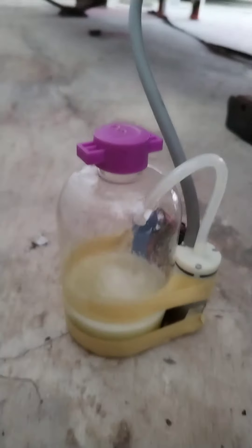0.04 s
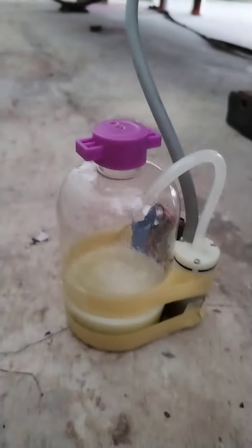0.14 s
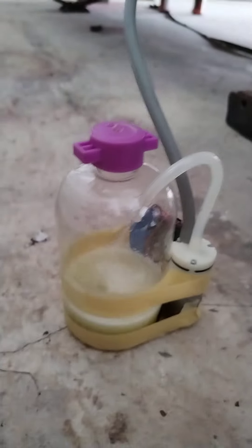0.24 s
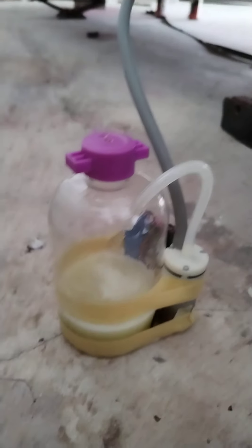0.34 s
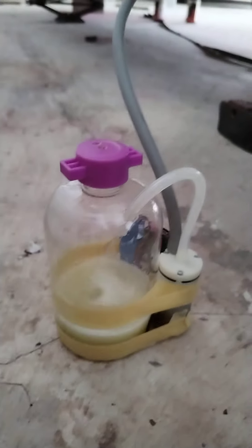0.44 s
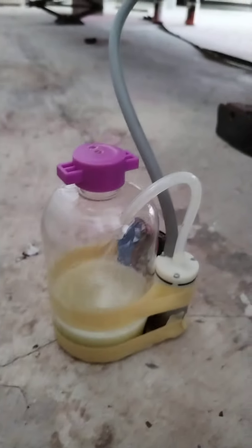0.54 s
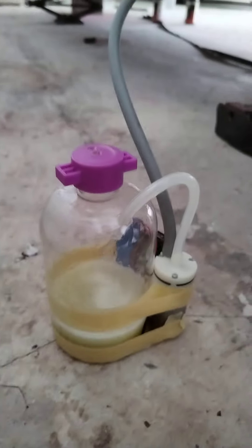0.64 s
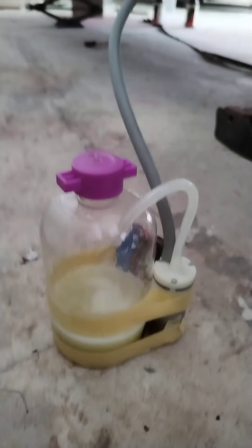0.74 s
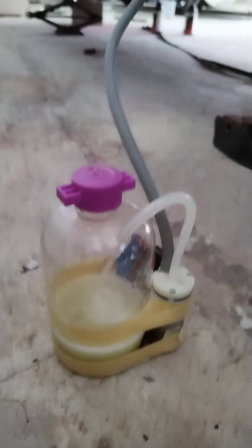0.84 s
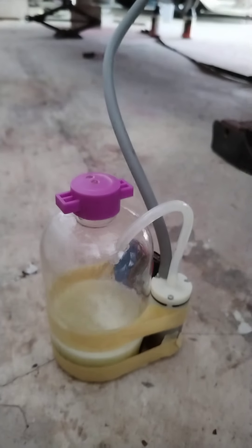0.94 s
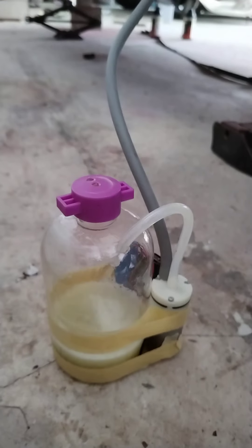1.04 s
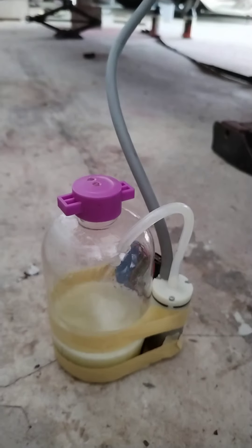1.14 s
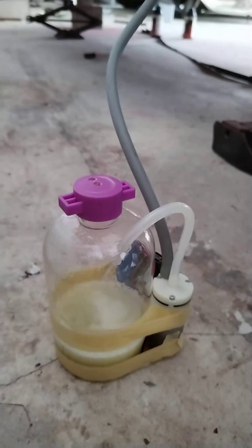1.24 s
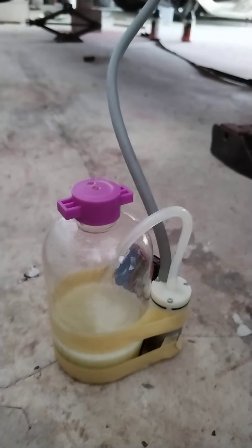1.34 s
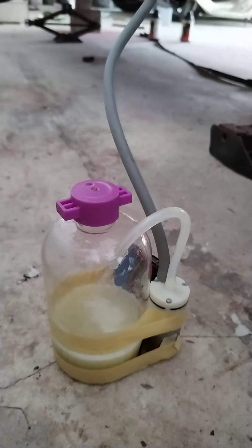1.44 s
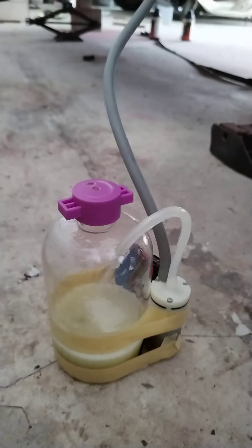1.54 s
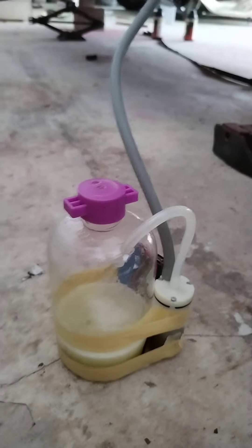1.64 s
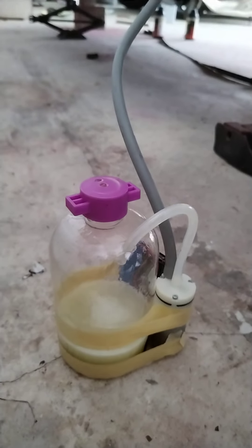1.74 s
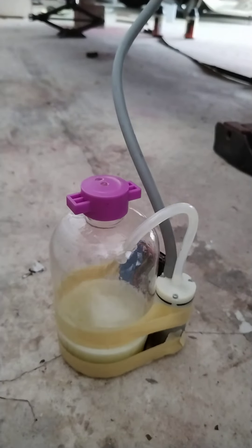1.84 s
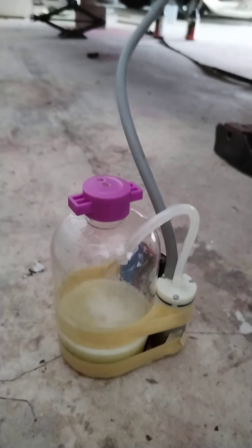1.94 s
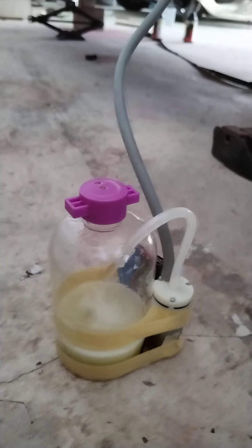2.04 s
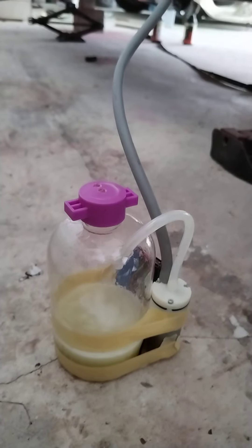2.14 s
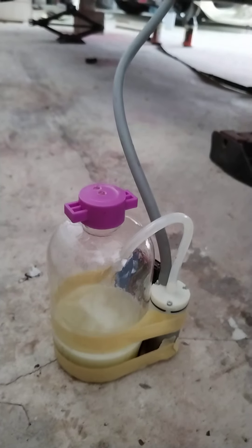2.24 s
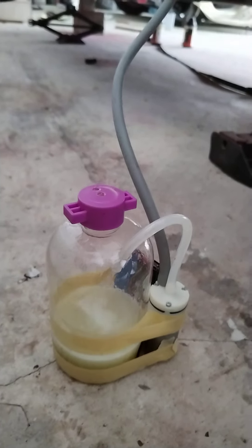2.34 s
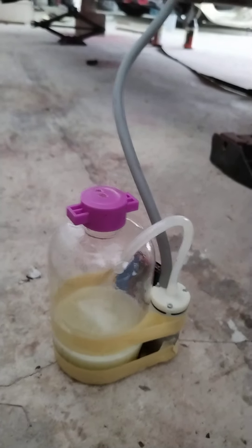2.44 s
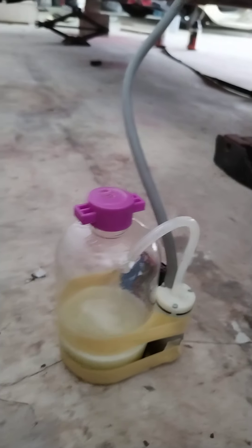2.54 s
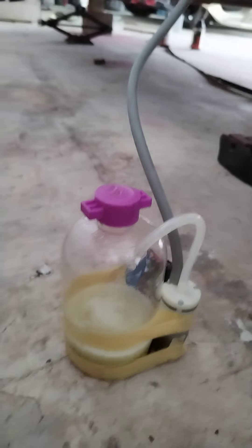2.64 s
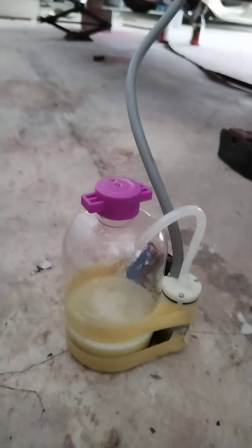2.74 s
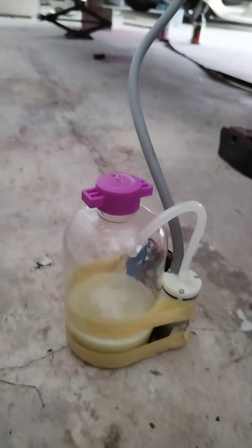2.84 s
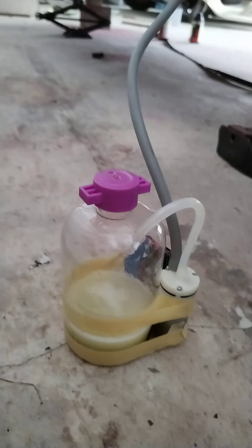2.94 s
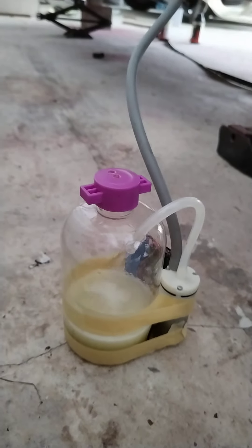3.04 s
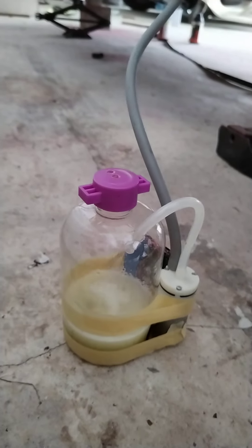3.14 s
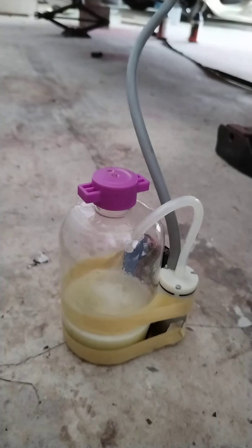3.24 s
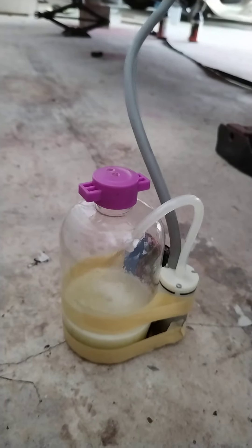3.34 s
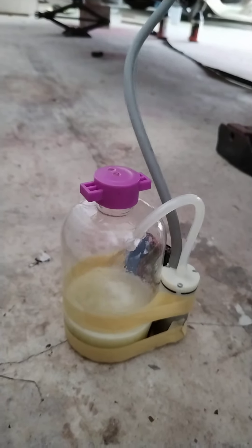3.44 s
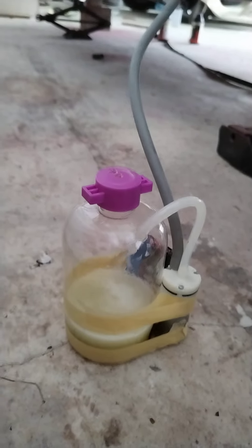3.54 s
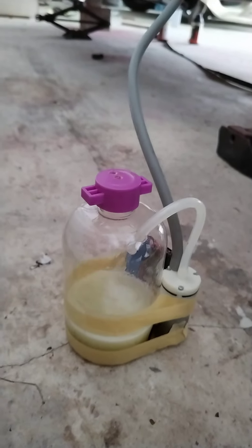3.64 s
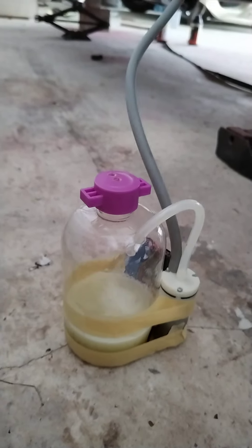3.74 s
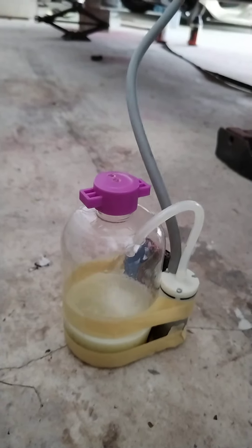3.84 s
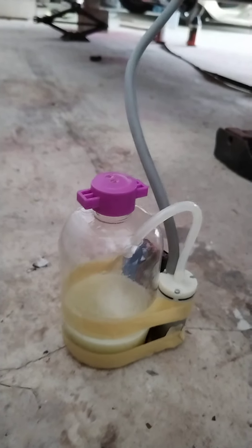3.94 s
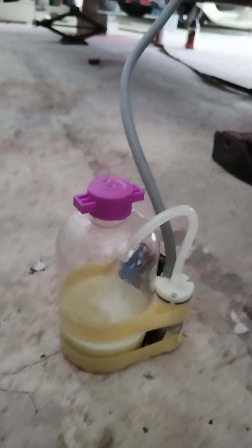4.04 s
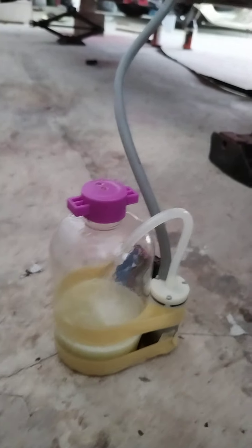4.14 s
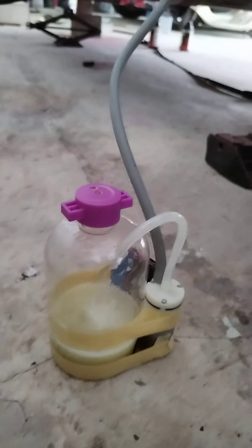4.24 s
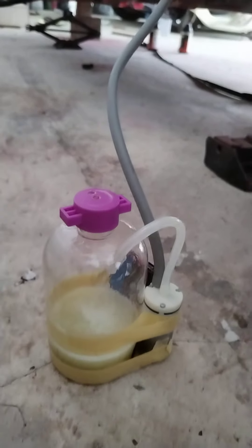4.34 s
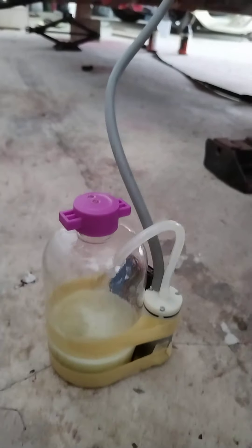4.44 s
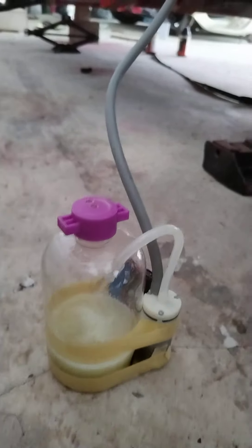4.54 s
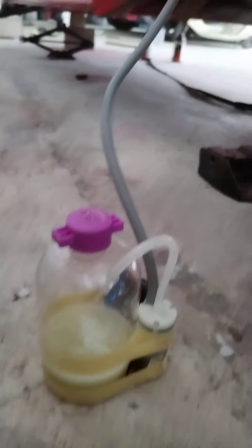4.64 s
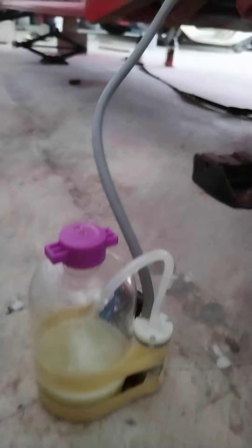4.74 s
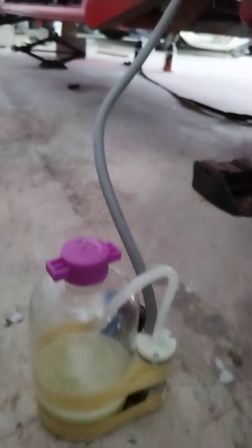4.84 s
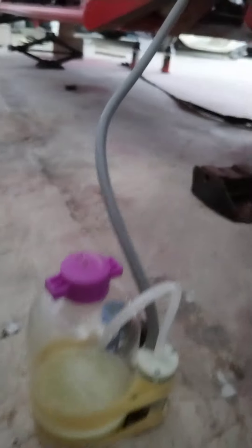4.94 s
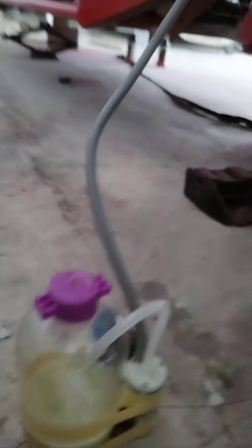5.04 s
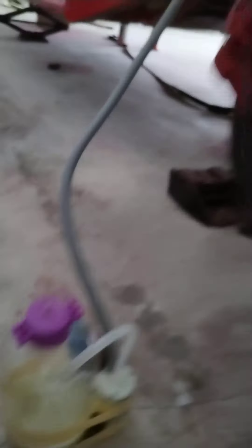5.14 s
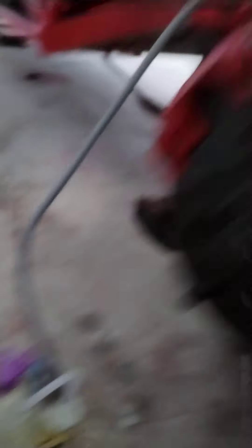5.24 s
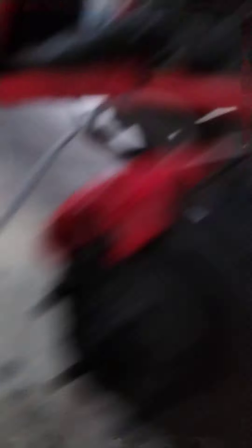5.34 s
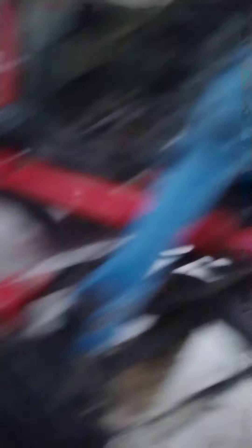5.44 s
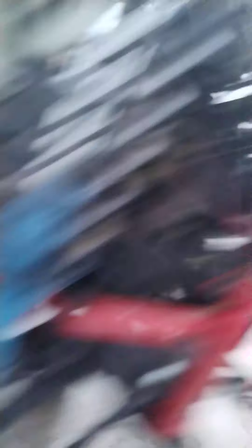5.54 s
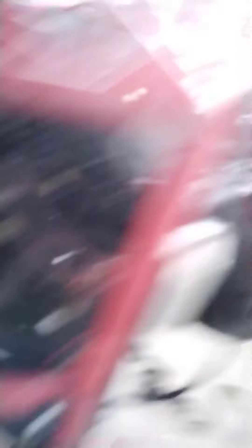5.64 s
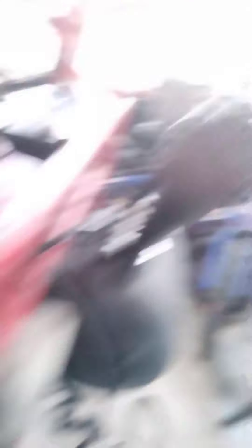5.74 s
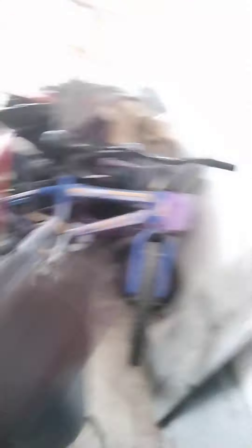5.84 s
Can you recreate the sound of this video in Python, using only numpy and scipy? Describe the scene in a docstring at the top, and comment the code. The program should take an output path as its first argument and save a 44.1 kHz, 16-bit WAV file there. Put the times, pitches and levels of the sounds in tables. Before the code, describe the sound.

Close up on a garage floor, a small suction pump draws oil into a plastic jar: constant bright, buzzing air hiss, low bubbling, wet gulps and crisp little spits. Near five seconds the handheld camera is bumped, with deep thuds and rubbing; it swings away, the hiss fades and a hard clack sounds.

```python
"""Garage floor: a small electric suction pump draws oil up a hose into a plastic jar.
Oil churns (filtered crackle, bubble tones, motor hum), gulps (decaying tones) and sloshes (jar resonances).
Air and spray hiss through the inlet (resonant noise), fluttering near the pump stroke rate.
Near the end the handheld camera is bumped and swung away: low knocks (decaying body modes), rubbing,
a sharp clack (noise burst), and the hiss falls behind."""
import sys
import numpy as np
from scipy import signal
from scipy.fft import rfft, irfft, next_fast_len
from scipy.io import wavfile
from scipy.ndimage import map_coordinates

SR = 44100
rng = np.random.default_rng(int(sys.argv[2]) if len(sys.argv) > 2 else 0)


def bounce(signal):
    """Save signal as a 16-bit WAV file at the path given by the first command-line argument."""
    frames = np.transpose(np.atleast_2d(signal))
    limited = np.clip(frames, -1, 1)
    pcm = np.round(limited * 32767).astype(np.int16)
    wavfile.write(sys.argv[1], SR, pcm)


N = 260184
STROKE_HZ = 217.5  # mean pump stroke rate
HISS_SPLIT_HZ = 7700  # between body and top of the hiss
TOP_HZ = 14350  # upper band limit
JAR_SHADOW, HISS_SHADOW, TOP_SHADOW = 3, 0.92, 1.02  # loss with the camera turn [dB per dB]
# rubbing after a bump: offset, growth [dB per dB of bump], fade
RUB_DB, RUB_GROWTH, RUB_FADE_DB_PER_S = -15.5, 0.85, 92

# Levels in the tables are relative.
# jar resonances at two microphones: (frequency [Hz], width scale [Hz], left [dB], right [dB])
JAR_MODES = [(917.3, 179, 2, -13), (949, 120, -31, -14.5), (1215.4, 112, -18.5, -10.5),
             (1655, 165, -7.5, -37), (1802, 120, -51.5, -8.5), (2040, 118, -11.5, -12.5),
             (2190, 104, 0.5, 3.5), (2462, 112, 1.5, -28), (2608, 203, -2, -68)]
# inlet tube resonances: (frequency [Hz], width scale [Hz], left [dB], right [dB])
TUBE_MODES = [(3020, 120, -13.5, -10.5), (3170, 144, -16.5, -12), (3524, 71, -26, -19.5),
              (3860, 144, -13, -13.5), (4390, 580, -16, -18)]
# air jet resonances: (frequency [Hz], width scale [Hz], left [dB], right [dB])
JET_MODES = [(4370, 110, -10, -9), (4625, 128, -2, -4.5), (5225, 400, -2, -6.5), (5666, 190, 6, -2),
             (6092, 550, 8.5, -5), (6674, 890, 3, -5.5), (7180, 950, -20, -12), (8592, 1620, -22.5, -6),
             (11800, 5500, -28.5, -23.5)]
# flow of oil into the jar: (time [s], level [dB])
OIL_FLOW = [(0.0, -43), (0.17, -41), (0.28, -48), (0.32, -45), (1.58, -51.5), (1.65, -47.5), (2.58, -42.5),
            (2.67, -51.5), (3.38, -40.5), (3.53, -47.5), (4.35, -44), (4.85, -48.5)]
# air jet: (time [s], body level [dB], top level [dB])
HISS_LEVELS = [(0.0, -38, -41.5), (.25, -37.5, -38), (1.1, -36.5, -39.5), (4.6, -36.5, -40),
               (4.9, -35, -40), (5.35, -35, -41.5)]
# pouring oil spectrum: (frequency [Hz], gain [dB])
OIL_SPECTRUM = [(15, -69), (25, -25.5), (91, -16), (137, -1.5), (156, -2), (188, -1.5), (225, -2.5),
                (259, -9), (294, -7), (360, -13), (435, -29.5), (494, -70), (520, -27), (680, -64),
                (1140, -120)]
# rubbing grip spectrum: (frequency [Hz], gain [dB])
GRIP_SPECTRUM = [(25, -56), (60, -43), (100, 0.5), (140, -3.5), (180, -4), (280, -7), (350, -34.5),
                 (450, -43), (600, -34), (1200, -54)]
# garage room tone spectrum: (frequency [Hz], gain [dB])
ROOM_SPECTRUM = [(30, -5), (150, -7.5), (450, 2), (1400, -2), (3400, -29), (14000, -4)]
# big air pockets bursting in the oil: (time [s], pitch [Hz], level [dB])
AIR_POCKETS = [(.01, 603, -45), (.26, 590, -50), (.42, 600, -42.5), (.825, 622, -40.5), (1.06, 685, -55),
               (1.745, 593, -40), (2.13, 604, -43), (2.61, 575, -44), (2.83, 568, -48), (2.95, 573, -50),
               (3.33, 607, -50), (3.48, 584, -45), (3.72, 580, -46.5), (4.02, 695, -45.5), (4.42, 592, -53)]
# sharp spits and ticks: (time [s], level [dB], left minus right [dB])
SPITS = [(0.133, -18.5, -2), (.216, -29, -5), (0.257, -29, -4), (1.074, -21, 0.5), (1.403, -37, 0),
         (1.425, -21, 9), (1.715, -23.5, 6), (3.058, -30, 4), (4.306, -32, -3), (4.386, -28, 3),
         (4.679, -43, -4), (4.905, -24.5, 6), (5.389, -19, 11), (5.54, -35, 20), (5.698, -28, 9),
         (5.804, -36, 13)]
# spit spectrum: (frequency [Hz], gain [dB])
SPIT_SPECTRUM = [(1500, -38), (3500, -32), (4800, -1), (6100, 11), (7600, 1.5), (8800, -3), (10500, -13.5),
                 (14000, -10)]
# bumps on the camera body: (time [s], level [dB], hardness [dB], deep push [dB])
BUMPS = [(4.902, -23.5, 14, -23), (4.93, -20, 6, -8), (5.030, -15, -5, 9.5), (5.069, -42, 12, 1),
         (5.235, -17.5, 8.5, -11), (5.253, -20, 4.5, 23.5), (5.266, -6, -4, 5), (5.291, -32, 13, 14),
         (5.317, -34, 7, -5), (5.356, -16.5, -9, -16), (5.385, -8, -8.5, 8), (5.412, -15.5, -3, -15),
         (5.491, -22.5, 1, 3), (5.519, -27.5, 0, 0), (5.560, -24, -12, 5), (5.600, -30, -26, -1),
         (5.848, -33, -34, -6)]
# camera body modes: (frequency [Hz], level [dB], t60 [s])
BODY_MODES = [(95.2, -18, 0.31), (142, -18, 0.092), (178.3, 2, 0.22), (222.4, -1.5, 0.16), (257, -46, 0.27),
              (294, -24.5, 0.74), (414, -21, 0.17), (446.5, -12.5, 0.1), (520, -17.5, 0.044),
              (645, -22, 0.056)]
# hard object struck nearby: (time [s], level [dB])
STRIKES = [(5.763, -12.5)]
# strike spectrum: (frequency [Hz], gain [dB])
STRIKE_SPECTRUM = [(180, -39), (300, -15), (1340, -3.5), (1640, -19), (1830, -3), (2600, -9.5), (3330, -6),
                   (3660, -21), (6780, -7), (7320, -31), (10900, -31), (12000, -52), (15600, -71),
                   (22000, -120)]
# camera turning away from the jar: (time [s], level [dB])
CAMERA_FACING = [(5.27, 1.5), (5.42, -1), (5.5, -3.5), (5.7, -7), (5.9, -16.5)]
# thick lumps of oil dropping into the jar: (time [s], length [s], level [dB])
OIL_LUMPS = [(.35, .04, -37), (.71, 0.019, -39), (.83, .025, -41.5), (.93, 0.026, -40),
             (1.095, 0.029, -37.5), (1.618, 0.026, -42), (2.37, 0.055, -40), (2.53, 0.04, -38),
             (2.97, 0.015, -35), (3.78, 0.034, -48), (3.93, .02, -44), (4.32, 0.087, -40), (4.5, 0.02, -52)]
# surges of oil washing the jar wall: (time [s], length [s], level [dB])
WALL_SURGES = [(0.153, 0.15, -42.5), (0.48, 0.037, -41.5), (0.81, 0.26, -41.5), (1.146, 0.24, -43),
               (1.75, 0.067, -51), (1.975, 0.026, -42.5), (2.933, 0.16, -47), (3.205, 0.058, -43.5),
               (3.315, 0.068, -46), (3.417, 0.1, -52), (3.647, 0.029, -49), (3.956, 0.025, -49),
               (4.349, 0.031, -41)]
# slugs of oil and air spurting through the inlet tube: (time [s], length [s], level [dB])
TUBE_SLUGS = [(.135, 0.029, -44), (.3, 0.14, -53), (.64, 0.11, -52), (1.495, 0.013, -45),
              (1.658, 0.0061, -43), (2.18, .35, -54), (3.085, 0.025, -45), (3.248, 0.017, -40.5),
              (3.365, 0.025, -47), (3.78, 0.12, -51.5), (4.298, 0.021, -46.5), (4.39, 0.038, -47),
              (4.9, 0.0079, -38), (4.925, 0.083, -50.5), (5.13, 0.043, -53), (5.385, 0.016, -39)]
# one jar resonance singing out: (time [s], length [s], level [dB])
JAR_WHISTLES = [(4.745, 0.029, -43), (4.96, 0.014, -39.5), (5.015, 0.034, -40.5), (5.07, 0.18, -48.5)]
# air on the microphone ports during the swing: (time [s], gain)
SWING = [(5.2, 0), (5.45, 1), (5.9, .7)]
# breeze spectrum: (frequency [Hz], gain [dB])
BREEZE_SPECTRUM = [(15, -24), (45, -12), (90, 2.5), (130, 0), (300, -38.0)]
# scuff spectrum: (frequency [Hz], gain [dB])
SCUFF_SPECTRUM = [(100, -38), (220, -2.0), (450, 10), (720, -9),
                  (1100, -20), (1800, -51), (3200, -14), (3900, -28)]


def amp(db):
    """Amplitude ratio of a level in dB."""
    return 10 ** (np.asarray(db) / 20)


def unit(x):
    """x scaled to rms 1."""
    return x / np.sqrt(np.mean(x ** 2) + 1e-20)


def seconds(length_s):
    """Sample times of a short sound."""
    return np.arange(int(SR * length_s)) / SR


def along(points, hz):
    """Interpolate (frequency [Hz], value) points on a log frequency axis."""
    f, v = np.transpose(points)
    return np.interp(np.log(hz + 1), np.log(f + 1), v)


def curves(rows):
    """One value per sample for each column after the time."""
    s, *cols = np.transpose(rows)
    return [np.interp(np.arange(N) / SR, s, c) for c in cols]


def wobble(rate_hz):
    """Smooth random curve with rate_hz knots a second."""
    return map_coordinates(rng.standard_normal(6000), [np.arange(N) * rate_hz / SR], mode="wrap")


def coloured(x, gain):
    """x through the causal minimum-phase filter of this gain against frequency."""
    m = 2 * next_fast_len(N // 2 + 8192)
    log_gain = np.log(np.maximum(gain(np.fft.rfftfreq(m, 1 / SR)), 1e-6))
    cepstrum = irfft(log_gain, m)
    cepstrum[..., 1:m // 2] *= 2
    cepstrum[..., m // 2 + 1:] = 0
    response = np.exp(rfft(cepstrum))
    return irfft(rfft(x, m) * response, m)[..., :N]


def shaped(x, spectrum):
    """x coloured by (frequency [Hz], gain [dB]) points."""
    return coloured(x, lambda hz: amp(along(spectrum, hz)))


def resonate(x, modes):
    """x through steep resonances, weighted separately at two microphones; rms 1."""
    def gain(hz):
        power = 0
        for f, width, left_db, right_db in modes:
            skirt = (1 + ((hz - f) / width) ** 2 * 2) ** 4
            power = power + amp([[left_db], [right_db]]) ** 2 / skirt
        return np.sqrt(power)
    return unit(coloured(x, gain))


def pair(apart):
    """White noise at two microphones, rms 1; apart is the side-to-mid ratio."""
    mid, side = rng.standard_normal((2, N))
    return unit(np.array([mid + apart * side, mid - apart * side]))


def crackle(rate_hz, spread_db, apart):
    """Single-sample bursts at random moments, sizes spread in dB; rms 1."""
    chance = rng.random(N)
    size = np.clip(rng.standard_normal(N), -2, 2)
    return unit((chance < rate_hz / SR) * amp(spread_db * size) * pair(apart))


def add(track, s, sound):
    """Mix a sound in at time s."""
    start = max(round(s * SR), 0)
    track[..., start:start + sound.shape[-1]] += sound[..., :max(N - start, 0)]


def patchy(x, band_hz, life_s, depth_db):
    """x with a random gain drifting over time and frequency; rms 1."""
    hz, t, z = signal.stft(x, SR, nperseg=512)
    grid = np.meshgrid(hz / band_hz, t / life_s, indexing="ij")
    field = map_coordinates(rng.standard_normal((400, 400)), grid, mode="wrap")
    z = z * amp(depth_db * np.clip(field, -2, 2))
    return unit(signal.istft(z, SR, nperseg=512)[1][:, :N])


def swells(rows, attack_s, release_s):
    """Attack, hold and release of each row; overlapping rows add in power."""
    t, power = np.arange(N) / SR, np.zeros(N)
    for s, length_s, db in rows:
        rise = np.clip((t - s) / attack_s + .5, 0, 1)
        fall = np.exp(-np.clip((t - s - length_s) / release_s, 0, 20))
        power += (amp(db) * rise * fall) ** 2
    return np.sqrt(power)


def room_tone():
    """Faint garage air: steady noise with a room spectrum."""
    return amp(-59.0) * unit(shaped(pair(apart=0.86), ROOM_SPECTRUM))


def bubble_drone():
    """Big slow bubbles: decaying tones whose pitch creeps up as each bubble rises."""
    out, t = np.zeros(N), seconds(1 / 3)
    starts = rng.uniform(0, N / SR, size=70)
    for s, (pitch, size) in zip(starts, rng.standard_normal((70, 2))):
        hz = 157 * np.exp(.05 * pitch) * (1 + 0.25 * t)
        swell = amp(2.4 * size - 60 * t / 0.49) * (1 - np.exp(-t / 0.015))
        add(out, s, swell * np.sin(2 * np.pi * hz * t))
    return unit(out)


def motor_hum():
    """Labouring motor: a tone wandering in level and around the stroke rate."""
    phase = 2 * np.pi * np.cumsum(STROKE_HZ + 9 * wobble(25)) / SR
    return unit(amp(3.6 * wobble(12.0)) * np.sin(phase))


def churn():
    """Oil pours in lumps, bubbles drone and the motor hums, all under the flow envelope."""
    flow_db, = curves(OIL_FLOW)
    facing_db, = curves(CAMERA_FACING)
    drops = amp(-5.5) * swells(OIL_LUMPS, attack_s=0.022, release_s=0.0092)
    pour = np.hypot(amp(flow_db - 0.6 + 0.17 * wobble(14)), drops)
    grains = crackle(rate_hz=460, spread_db=0, apart=0.23) + .5 * pair(apart=0.56)
    lumps = unit(shaped(grains, OIL_SPECTRUM))
    mix = unit(lumps + 0.85 * bubble_drone() + 0.42 * motor_hum())
    return pour * amp(facing_db + np.array([[-1.2], [1.0]])) * mix


def slosh():
    """Bursting froth rings the jar; surges feed now one, now another of its middle resonances."""
    facing_db, = curves(CAMERA_FACING)
    surge_level = amp(-1.6) * swells(WALL_SURGES, attack_s=0.031, release_s=0.061)
    level = np.hypot(amp(-52.5 + 0.87 * wobble(9)), surge_level)
    froth = crackle(rate_hz=1000, spread_db=-2.0, apart=1.0) * amp(1.2 * wobble(45))
    surge = level * patchy(resonate(froth, JAR_MODES[2:6]), band_hz=139.8, life_s=.035, depth_db=6.5)
    foam = crackle(rate_hz=1500, spread_db=2, apart=0.51) * amp(0.46 * wobble(24))
    wash = amp(-49.0) * patchy(resonate(foam, JAR_MODES), band_hz=203, life_s=.05, depth_db=3.5)
    return (surge + wash) * amp(JAR_SHADOW * facing_db)


def spatter():
    """Oil and air spit softly in the inlet tube, and loudly when a slug passes."""
    facing_db, = curves(CAMERA_FACING)
    slugs = amp(2.5) * swells(TUBE_SLUGS, attack_s=0.0063, release_s=0.0089)
    level = np.hypot(amp(-53.5 + 1.9 * wobble(6.39) + 0.57 * facing_db), slugs)
    spits = crackle(rate_hz=870, spread_db=0.5, apart=1.0) * amp(1.3 * wobble(40))
    return level * patchy(resonate(spits, TUBE_MODES), band_hz=243, life_s=.04, depth_db=3.5)


def hiss():
    """Air tears the oil into spray, in a small puff at every pump stroke."""
    body_db, top_db = curves(HISS_LEVELS)
    facing_db, = curves(CAMERA_FACING)
    stroke = np.cos(2 * np.pi * np.cumsum(STROKE_HZ + 16 * wobble(70)) / SR)
    flow = amp(1.37 * stroke + 0.39 * wobble(130) + 0.8 * wobble(35))
    spray = crackle(rate_hz=3200, spread_db=7.0, apart=1.0) + 1.18 * pair(apart=0.96)
    jet = patchy(resonate(flow * spray, JET_MODES), band_hz=705, life_s=.012, depth_db=2.0)
    top = unit(coloured(jet, lambda hz: 1 / (1 + (HISS_SPLIT_HZ / (hz + 1)) ** 16) ** .5))
    body = unit(coloured(jet, lambda hz: 1 / (1 + (hz / HISS_SPLIT_HZ) ** 16) ** .5))
    # the top loses slightly more in the turn
    body_level = amp(body_db + 3.0 + HISS_SHADOW * facing_db)
    top_level = amp(top_db + 5.0 + TOP_SHADOW * facing_db)
    return body_level * body + top_level * top


def gulps():
    """Each air pocket gargles briefly at its own pitch, and its splash rings the jar."""
    gargles, splashes, t = np.zeros(N), np.zeros(N), seconds(1 / 4)
    swell = (1 - np.exp(-t / 0.0044)) * amp(-60 * t / 0.28)
    for s, hz, db in AIR_POCKETS:
        # random flutter of level and phase, 120 knots a second
        size = map_coordinates(rng.standard_normal(200), [t * 120], mode="wrap")
        phase = map_coordinates(rng.standard_normal(200), [t * 120], mode="wrap")
        gargle = np.sin(2 * np.pi * hz * t + 0.57 * phase)
        add(gargles, s, amp(db + 4.4 * size) * swell * gargle)
        add(splashes, s, amp(db - 3.7) * swell)
    ringing = resonate(crackle(rate_hz=780, spread_db=4.0, apart=0.59), JAR_MODES[:5])
    return gargles * amp([[2], [-12]]) + splashes * ringing


def ticks():
    """Sharp spits: noise bursts of a few milliseconds with a faint longer tail."""
    out, t = np.zeros((2, N)), seconds(1 / 25)
    decay = amp(-60 * t / 0.011) + amp(-31 - 60 * t / 0.092)
    fade = (1 - np.exp(-t / 0.00024)) * decay
    for s, db, pan_db in SPITS:
        level = amp(db + 8.5 + np.array([[pan_db], [-pan_db]]) / 2)
        add(out, s, level * fade * rng.standard_normal((2, len(t))))
    return shaped(out, SPIT_SPECTRUM)


def whistle():
    """Air over the oil briefly holds one jar resonance as a hoarse, wavering tone."""
    hoarse = .9 * wobble(150)
    phase = 2 * np.pi * np.cumsum(1622 + 25 * wobble(40)) / SR + hoarse
    level = amp(2.7 * wobble(110) + np.array([[6], [-8]]))
    return swells(JAR_WHISTLES, attack_s=0.0085, release_s=0.014) * level * np.sin(phase)


def knocks():
    """Each bump rings the camera body; hardness lifts the upper modes, a deep push the lowest."""
    out, t = np.zeros((2, N)), seconds(1 / 2)
    for s, db, hard_db, push_db in BUMPS:
        variations = rng.standard_normal((len(BODY_MODES), 3))
        for (hz, mode_db, t60_s), (size, lean, lag) in zip(BODY_MODES, variations):
            octaves = np.log2(hz / BODY_MODES[2][0])
            upper, lower = np.clip(octaves, 0, 1), np.clip(-2 * octaves, 0, 1)
            # short waves differ more between the microphones
            ports = np.array([[1], [-1]]) * hz / 1100
            rise = 1 - np.exp(-(t * hz / 1.4) ** 2)  # builds up over about one cycle
            ring = np.sin(2 * np.pi * hz * t + ports * lag) * amp(-60 * t / t60_s) * rise
            contact_db = db + hard_db * upper + push_db * lower
            add(out, s, amp(contact_db + mode_db + size + ports * (5.5 + 4.9 * lean)) * ring)
    return out


def rubbing():
    """Fingers rub on the case after each bump: low noise, fades added in power."""
    power, t = np.zeros(N), seconds(1)
    for s, db, _, push_db in BUMPS:
        push = db + min(push_db, 0)  # glancing bumps hardly shift the grip
        fade = amp(RUB_DB + RUB_GROWTH * push - RUB_FADE_DB_PER_S * t)
        add(power, s, (fade * (1 - np.exp(-t / 0.012))) ** 2)
    return np.sqrt(power) * unit(shaped(pair(apart=0.31), GRIP_SPECTRUM))


def scuffs():
    """Fingers scuff at each contact: short, partly shared noise bursts."""
    out, t = np.zeros((2, N)), seconds(1 / 5)
    for s, db, hard_db, _ in BUMPS:
        rub = rng.standard_normal(len(t)) + .5 * rng.standard_normal((2, len(t)))
        fade = amp(db + hard_db - 6 - 60 * t / 0.25) * (1 - np.exp(-t / 0.0015))
        add(out, s, fade * rub)
    return shaped(out, SCUFF_SPECTRUM)


def breeze():
    """Air on each microphone port as the camera swings: low, wide noise."""
    swing, = curves(SWING)
    return swing * amp(-36.5) * unit(shaped(pair(apart=0.98), BREEZE_SPECTRUM))


def clack():
    """A hard, dry noise burst with a short answer from the garage walls."""
    out, t = np.zeros((2, N)), seconds(1 / 4)
    for s, db in STRIKES:
        noise = rng.standard_normal(len(t)) + 1.33 * rng.standard_normal((2, len(t)))
        blow = amp(-60 * t / 0.023) * noise
        walls = amp(-10 - 60 * t / 0.28) * rng.standard_normal((2, len(t)))
        add(out, s, amp(db + 4) * (blow + walls))
    return shaped(out, STRIKE_SPECTRUM)


def scene():
    """Sum of the pump, the camera handling, the clack and the room tone."""
    pump = churn() + slosh() + spatter() + hiss() + gulps() + ticks() + whistle()
    handling = knocks() + rubbing() + scuffs() + breeze()
    return room_tone() + pump + handling + clack()


def record(dry):
    """Brick-wall low-pass at the camera's band limit."""
    m = next_fast_len(N + 8192)
    passband = np.fft.rfftfreq(m, 1 / SR) < TOP_HZ
    return irfft(rfft(dry, m) * passband, m)[:, :N]


dry = scene()
out = record(dry)
bounce(out)
```